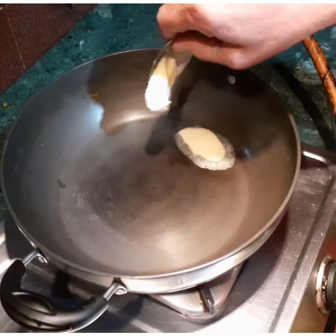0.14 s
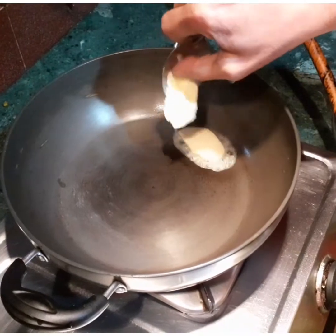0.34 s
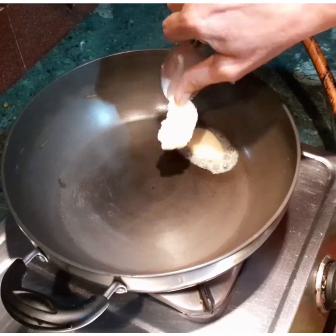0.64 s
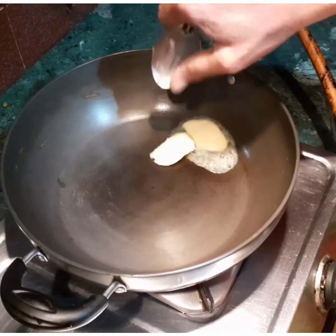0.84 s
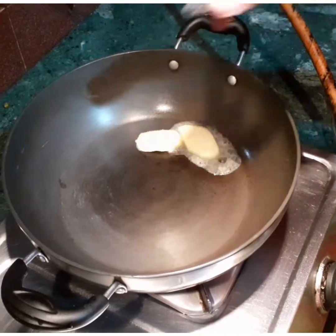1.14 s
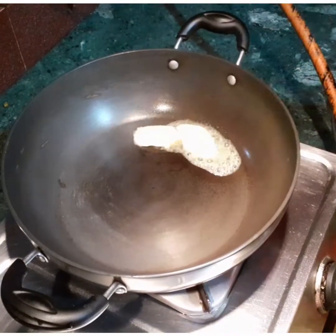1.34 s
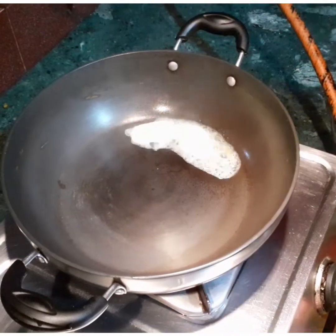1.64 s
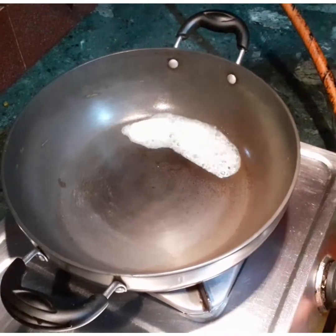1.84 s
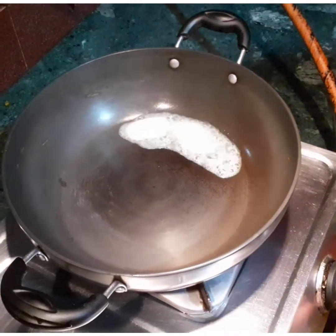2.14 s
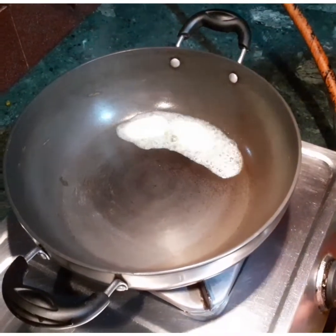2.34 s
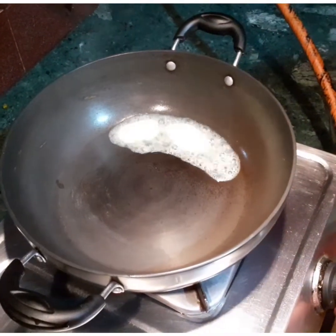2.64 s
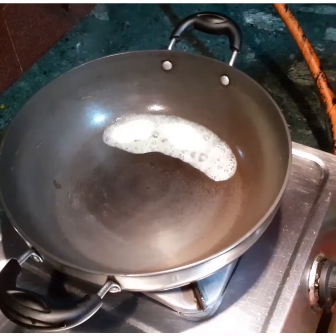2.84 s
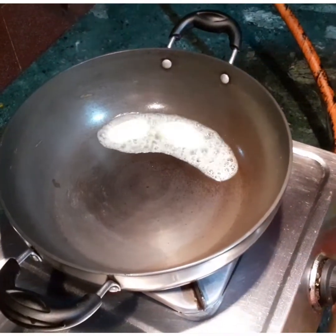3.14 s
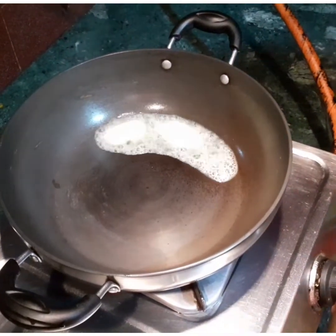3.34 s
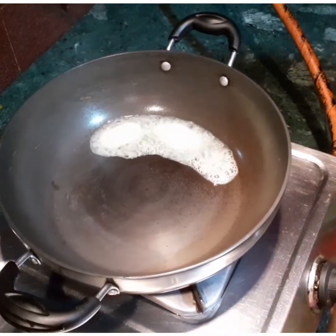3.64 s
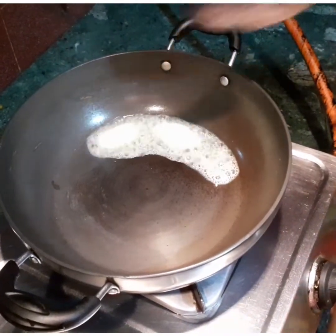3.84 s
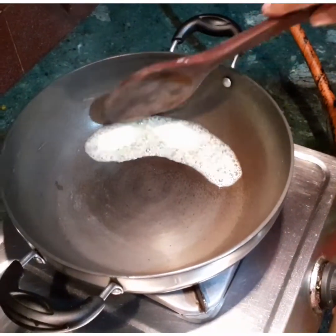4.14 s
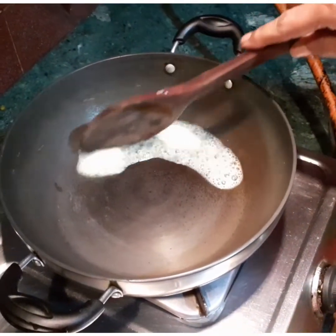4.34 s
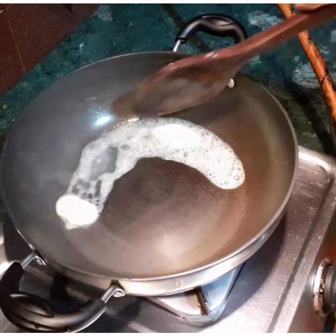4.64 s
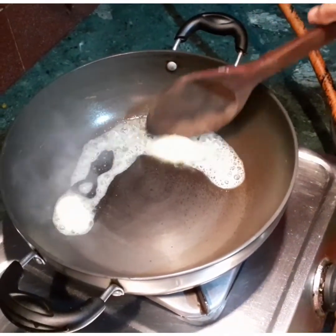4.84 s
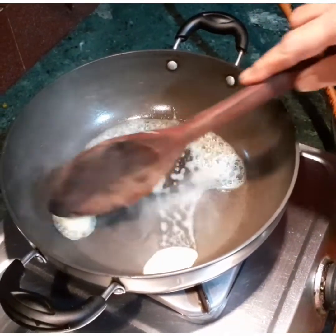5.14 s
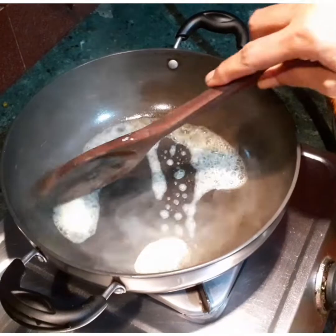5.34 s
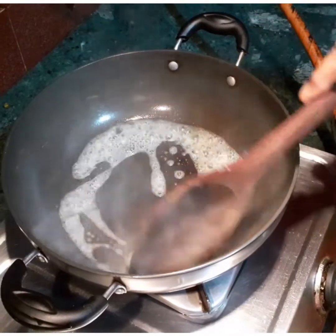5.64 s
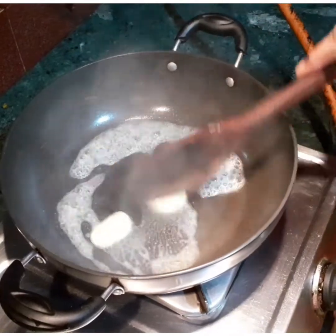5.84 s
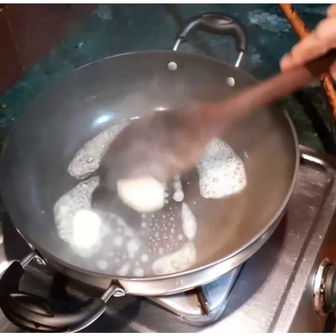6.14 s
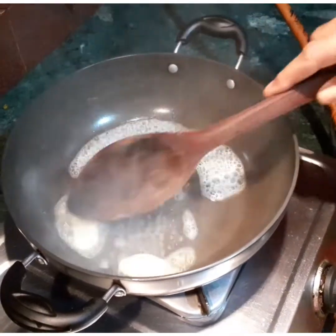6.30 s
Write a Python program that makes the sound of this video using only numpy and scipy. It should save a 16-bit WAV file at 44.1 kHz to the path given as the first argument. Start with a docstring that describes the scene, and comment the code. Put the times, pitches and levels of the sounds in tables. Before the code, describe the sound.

Butter sizzles close to the microphone for the whole six and a half seconds: a fine, high fizz with tiny bursting bubbles, over a low, slightly wavering appliance hum. Sharp little spits of steam dot the first two seconds and return occasionally later. At about 2.5 seconds a steel spoon clinks nearby, then at 2.7 gives a short, loud, gritty scrape with a bright ring, damped by 2.9. The sizzle dips slightly afterwards and slowly recovers. From 4.2 seconds a wooden spatula knocks the thin pan, striking again at about 4.7, 4.8, 5.3 and 5.7. Each knock is a woody clack with a brief metallic ring, the later ones trailed by short, rough drags. The sizzle flares brighter around 4.4, 4.9 and 5.8 seconds as butter spreads over hot metal, with one more clear spit near 6.2. The utensils carry a short, tight kitchen reflection.

```python
"""Butter sizzling in a pan

Butter foams in a thin round pan over a gas flame, close to a phone with two microphone ports: bubbles
burst and steam spits while a kitchen appliance hums. A steel spoon clinks down and scrapes nearby,
loud enough to make the phone turn itself down. Then a wooden spatula knocks the pan and smears the
butter over hot metal, where it flares up."""
import sys
import numpy as np
from scipy import signal
from scipy.fft import rfft, irfft, next_fast_len
from scipy.io import wavfile
from scipy.ndimage import uniform_filter1d

SR = 44100
rng = np.random.default_rng(int(sys.argv[2]) if len(sys.argv) > 2 else 0)


def master_out(mix):
    """Clip the mix to full scale and print it as 16-bit PCM to the path in sys.argv[1]."""
    frames = np.transpose(np.atleast_2d(mix))
    ceiling = np.clip(frames, -1, 1)
    pcm = np.round(ceiling * 32767).astype(np.int16)
    wavfile.write(sys.argv[1], SR, pcm)


N = 285327
T = np.arange(N) / SR


def undb(db):
    return 10 ** (np.asarray(db) / 20)


def unit_rms(x):
    return x / np.sqrt(np.mean(x ** 2))


def highpass(x, hz):
    return signal.sosfilt(signal.butter(2, hz, "high", fs=SR, output="sos"), x)


def over_time(rows):
    """Table columns joined by straight lines in time."""
    times_s, *columns = np.transpose(rows)
    return [np.interp(T, times_s, column) for column in columns]


def over_frequency(rows, hz):
    """Table read on a log frequency axis."""
    points_hz, values = np.transpose(rows)
    return np.interp(np.log(hz + 1), np.log(points_hz), values)


def envelope(start_s, length_s, rise_s, fade_s):
    """Straight rise, hold to the end of the length, exponential fade."""
    return np.clip((T - start_s) / rise_s, 0, 1) * np.exp(-np.maximum(T - start_s - length_s, 0) / fade_s)


def ring(x, hz, t60_s):
    """One decaying mode driven by x."""
    pole = np.exp((2j * np.pi * hz - np.log(1000) / t60_s) / SR)
    return signal.lfilter([1], [1, -pole], x).imag


def resonance(x, hz, width_hz):
    """A mode set by its bandwidth; rms 1."""
    return unit_rms(ring(x, hz, np.log(1000) / np.pi / width_hz))


def wander(rate_hz):
    """Random steps smoothed twice; spread about 1.5."""
    hold = int(SR / rate_hz)
    steps = np.repeat(rng.standard_normal(N // hold + 1), hold)
    return 2.04 * uniform_filter1d(uniform_filter1d(steps, hold), hold)[:N]


def pops(per_s, scatter_db):
    """Two streams of random impulses of uneven size."""
    hits = rng.random((2, N)) < per_s / SR
    return hits * rng.standard_normal((2, N)) * undb(scatter_db * rng.exponential(size=(2, N)))


# Port balance. Each row: frequency in Hz, left minus right in dB.
PORT_BALANCE = [(60, 7.5), (1000, 0), (3400, 2), (4500, 2), (6000, -7.5), (8200, -8), (10000, 1.5),
                (13000, 1.5), (15500, 4.5)]
# Port coherence. Each row: frequency in Hz, left-right likeness from 0 to 1.
PORT_COHERENCE = [(60, 0.7), (130, 0.98), (290, 0.78), (640, 0), (1410, 0.1), (3100, 0.15), (6820, 0),
                  (15000, 0)]


def at_ports(pair, spectrum, lo_hz=0., hi_hz=SR):
    """Two unrelated signals become left and right with a soft-edged spectrum; their mean has rms 1."""
    size = next_fast_len(N)
    hz = np.arange(size // 2 + 1) * SR / size
    likeness = np.clip(over_frequency(PORT_COHERENCE, hz), 0, 1)
    edge_loss = np.sqrt((1 + (lo_hz / (hz + 1)) ** 8) * (1 + (hz / hi_hz) ** 8))
    gain = undb(over_frequency(spectrum, hz)) / edge_loss
    mid, side = rfft(pair, size) * gain * np.sqrt([1 + likeness, 1 - likeness])
    lean = undb(over_frequency(PORT_BALANCE, hz) / 2)
    stereo = irfft([(mid + side) * lean, (mid - side) / lean], size)[:, :N]
    return stereo / np.std(stereo.mean(axis=0))


# Pan resonances under the foam. Each row: frequency in Hz, width in Hz, relative level in dB.
FOAM_RESONANCES = [(1289, 8.4, -4), (1508, 22, -2), (1675, 56, -2.5), (1995, 74, -5), (3085, 54, 3)]


def big_bubbles(spectrum):
    """Big bubbles burst low in the spectrum and ring the pan."""
    bursts = pops(5000, 0.96)
    pan = sum(undb(db) * resonance(bursts, hz, width_hz) for hz, width_hz, db in FOAM_RESONANCES)
    return at_ports(bursts, spectrum, hi_hz=2440) + undb(-6.5) * pan


# Strongest spits of steam. Each row: start in seconds, level in dB re fizz.
STRONG_SPITS = [(.205, 3), (.255, -10), (.505, 2), (.70, 6), (.87, -7), (1.31, 4), (1.39, 3), (1.535, -2),
                (1.665, -14), (2.025, 5), (2.055, -8), (2.11, -2), (2.27, -7), (3.565, -9), (4.51, -4),
                (4.96, -10), (5.87, -19), (5.92, -12), (6.18, 1)]


def steam_spits(spectrum):
    """Droplets spit sudden puffs of steam that die in milliseconds."""
    rise_s, strong_fade_s, small_fade_s = 0.0043, 0.013, 0.012
    droplets = np.abs(pops(90, 0.3)[0])
    small = signal.lfilter([1], [1, -np.exp(-1 / (small_fade_s * SR))], droplets)
    strong = sum(undb(db) * envelope(s, rise_s, rise_s, strong_fade_s) for s, db in STRONG_SPITS)
    return (undb(-8) * small + strong) * at_ports(rng.standard_normal((2, N)), spectrum, lo_hz=2880)


# Settled foam. Each row: time in seconds, fizz in dB, fine and big bubbles in dB re fizz.
FOAM_LEVELS = [(0, -38, 3, -15), (.65, -36, 1, -18), (1.05, -35.5, 2, -17), (1.25, -35.5, 1.5, -12.5),
               (1.6, -35.5, 2.5, -13.5), (2.2, -35, -0.5, -13), (2.9, -34.5, 1, -19), (4.25, -35, -1, -15),
               (4.85, -34.5, -1.5, -17), (5.7, -34, .5, -16), (6.47, -35.5, 1, -14)]
# Fizz spectrum, with the ports' notch. Each row: frequency in Hz, relative density in dB.
FIZZ_SPECTRUM = [(410, -70), (700, -28), (757, -50), (947, -13.5), (1120, -20.5), (1500, -8), (2060, -9),
                 (2500, -8.5), (2970, -6), (3300, -5.5), (4400, -2), (5500, -3), (6630, -6.5), (8400, -26),
                 (9090, -18), (13800, -4), (15200, -3), (16200, -18)]
# Butter meets fresh hot metal. Each row: start in seconds, lift of the fine bubbles in dB.
BUTTER_FLARES = [(.74, 2), (1.58, 2), (1.97, 1), (4.4, 7), (4.89, 9), (5.79, 5.5)]


def sizzle():
    """Big, middle and fine bubbles burst in their own bands and swell together with the spits."""
    rise_s, fade_s, fizz_share = 0.11, 0.44, 0.31
    flare_db = sum(db * envelope(s, rise_s, rise_s, fade_s) for s, db in BUTTER_FLARES)
    fizz_db, fine_db, big_db = over_time(FOAM_LEVELS)
    fizz_db += fizz_share * flare_db
    fine_db += (1 - fizz_share) * flare_db
    big = big_bubbles(FIZZ_SPECTRUM) * undb(big_db + wander(15))
    middle = at_ports(pops(20000, 0.23), FIZZ_SPECTRUM, lo_hz=2730, hi_hz=7750)
    middle *= undb(0.5 * wander(25.07))
    fine = at_ports(pops(20000, 0.53), FIZZ_SPECTRUM, lo_hz=8600) * undb(fine_db + 0.5 * wander(25))
    return (big + middle + fine + steam_spits(FIZZ_SPECTRUM)) * undb(fizz_db + 0.17 * wander(9))


# Background. Each row: time in seconds, hum in dB, upper soft band in dB, lower soft band in dB.
KITCHEN_LEVELS = [(0, -55, -73, -62), (.12, -54, -65, -56.5), (.45, -54, -63.5, -66), (.99, -53, -57, -72),
                  (1.4, -55, -63, -63.5), (2.6, -55, -67, -69), (3.0, -51.5, -66, -56),
                  (3.27, -54, -61.5, -59), (3.45, -55.5, -66, -66), (3.8, -56, -51.5, -74),
                  (4.45, -54.5, -65, -68), (5.0, -54, -50.5, -77), (5.45, -50, -57, -71.5),
                  (6.0, -52, -58, -54), (6.47, -57, -50.5, -84)]
# Rumble spectrum. Each row: frequency in Hz, relative density in dB.
RUMBLE_SPECTRUM = [(15, -70), (25, -56), (45, -33), (91, -7), (166, -11), (202, -10.5), (262, -10.5),
                   (492, -11), (560, -9.5), (750, -14.5), (1200, -12), (1560, -46), (2640, -120)]
# Mains tones. Each row: frequency in Hz, level in dB re hum.
MAINS_TONES = [(100, -6.5), (200, 0.5), (300, -9.5)]
# Rough low bands. Each row: frequency in Hz, width in Hz, level in dB re hum.
ROUGH_BANDS = [(84, 3.1, -14), (140.4, 3.2, -12), (219.8, 6.5, -5.5)]
# Soft bands, upper first. Each row: frequency in Hz, width in Hz.
SOFT_BANDS = [(569, 31), (374.6, 30)]


def appliance_hum():
    """Rumble with wavering mains tones and rough low bands; two soft bands come and go."""
    hum_db, *bands_db = over_time(KITCHEN_LEVELS)
    hum = at_ports(rng.standard_normal((2, N)), RUMBLE_SPECTRUM) * undb(-3 + 1.6 * wander(7.9))
    for hz, db in MAINS_TONES:
        level = undb(db + 0.52 * wander(5.5) + 1.8 * wander(24.11))
        hum += level * np.sin(2 * np.pi * hz * T + wander(4))
    for hz, width_hz, db in ROUGH_BANDS:
        hum += undb(db) * resonance(rng.standard_normal(N), hz, width_hz)
    soft = sum(undb(db) * resonance(rng.standard_normal(N), hz, width_hz)
               for (hz, width_hz), db in zip(SOFT_BANDS, bands_db))
    return hum * undb(hum_db) + soft


# Steel spoon modes. Each row: frequency in Hz, scrape level in dB, T60 in seconds, strongest moment
# in seconds, spread around it in seconds, tap level in dB.
SPOON_MODES = [(1970, -21, .2, 2.72, .07, -40), (2180, -14, .18, 2.74, .06, -25),
               (2710, -21, .12, 2.72, .08, -18), (2988, -15, .4, 2.76, .06, -40),
               (3610, -20, .12, 2.76, .08, -16), (3946, -11, .12, 2.73, .04, -10),
               (4172, -15, .06, 2.72, .07, -4), (4370, -18, .08, 2.72, .09, -12),
               (4680, -23, .1, 2.7, .06, -11), (4840, -9, .13, 2.72, .06, -40),
               (5421, -13, .2, 2.77, .08, -13), (5749, -12, .15, 2.72, .08, -40),
               (6207, -16, .15, 2.72, .08, -20), (7090, -4, .3, 2.78, .05, -22),
               (9254, -18, .2, 2.79, .07, -30), (10230, -24, .12, 2.75, .08, -26),
               (10740, -19, .12, 2.76, .09, -18), (11270, -10, .25, 2.79, .07, -16),
               (11840, -12, .2, 2.73, .08, -15), (12130, -11, .12, 2.72, .07, -11),
               (12930, -4, .1, 2.70, .13, -4), (13760, 0, .3, 2.79, .1, -6),
               (15120, -7, .1, 2.73, .08, -16), (15400, -10, .15, 2.70, .07, -30),
               (15700, -4, .3, 2.77, .08, -30)]
# Clink, scrape, light end. Each row: start and length in seconds, then tap, slide and rasp in dB.
SPOON_CONTACTS = [(2.458, 0.029, -26, -70, -27), (2.665, 0.2, -31.5, -24.5, -27.5),
                  (2.86, 0.025, -70, -70, -38)]


def spoon():
    """A gritty contact rasps and feeds the spoon's modes, each strong in turn, until a hand damps them."""
    touch_s, tap_s, lift_s, rasp_fade_s = 0.001, 0.028, 0.003, 0.014
    strike_db, strike_fade_s, press_db_per_s = -2, 0.002, 18
    damp_from_s, damp_fade_s = 2.865, 0.037
    tap = slide = rasp = 0
    for start_s, length_s, tap_db, slide_db, rasp_db in SPOON_CONTACTS:
        strike = undb(strike_db) * envelope(start_s, touch_s, touch_s, strike_fade_s)
        tap += undb(tap_db) * (envelope(start_s, tap_s, touch_s, lift_s) + strike)
        press_db = press_db_per_s * np.clip(T - start_s, 0, length_s)
        slide += undb(slide_db + press_db) * envelope(start_s, length_s, touch_s, lift_s)
        rasp += undb(rasp_db) * envelope(start_s, length_s, touch_s, rasp_fade_s)
    span = slice(int(2.4 * SR), int(3.2 * SR))
    t = T[span]
    chatter_db = 1.2 * wander(150)[span]
    ringing = 0
    for hz, scrape_db, t60_s, peak_s, spread_s, tap_db in SPOON_MODES:
        reach = np.exp(-0.5 * ((t - peak_s) / spread_s) ** 2)
        feed = tap[span] * undb(tap_db) + slide[span] * undb(scrape_db + chatter_db) * reach
        shared_grit = rng.standard_normal(len(t))
        grit = shared_grit + 2.3 * rng.standard_normal((2, len(t)))
        # the root keeps the level independent of the decay
        ringing += ring(grit * feed, hz, t60_s) * np.sqrt(np.log(1000) / t60_s / SR)
    sound = steel_rasp() * rasp
    sound[:, span] += ringing * np.exp(-np.maximum(t - damp_from_s, 0) / damp_fade_s)
    return sound


# Rasp spectrum. Each row: frequency in Hz, relative density in dB.
RASP_SPECTRUM = [(120, -47), (200, -11), (780, -16.5), (1150, -7.5), (1820, -17.5), (2140, -26),
                 (2440, -18), (4900, -10), (6700, -11), (7080, -10), (9680, -22), (13500, 7.5), (16200, -9)]


def steel_rasp():
    """Dense, stuttering grit of the spoon's contact."""
    return at_ports(pops(9000, 0.48), RASP_SPECTRUM) * undb(2 * wander(90))


# Pan modes. Each row: frequency in Hz, level in dB struck on the wall, level in dB struck on the
# floor, T60 in seconds, left minus right in dB.
PAN_MODES = [(155.5, -14, -38, 0.37, 7), (273.7, -6.5, -9, 0.88, -2), (406, 0, -15.5, 0.7, 4),
             (622, -9, -21.5, 0.81, 7), (714, -19, -30, 0.29, -7), (832, -18, -11, 0.5, -11),
             (917, -14, -3.5, 0.2, 15), (1192, -12, -7.5, 0.57, 2), (1300, -15, -5, 0.14, -15),
             (1850, -2, -17, 0.29, -9), (2140, -22, -6, 0.2, 0), (2200, -33, -10, 0.19, -2),
             (2369, -4, -16, 0.2, -16), (2450, -10, -11, 0.19, 7), (2840, -6, -4, 0.1, -16),
             (3080, -7, 6, 0.081, 7), (3360, -10, -7, 0.068, 26)]
# Spatula modes. Each row: frequency in Hz, level in dB, T60 in seconds, left minus right in dB.
WOOD_MODES = [(444, 1, 0.087, -1), (552, 0, 0.2, 2), (895, -8, 0.39, 0), (977, -12, 0.21, 24.5),
              (1494, -1, 0.069, -2), (1630, 4, 0.12, 10)]


def pan_and_wood(t, place, pan_db, wood_db):
    """The modes of one blow swell in and ring out; high ones swell much faster."""
    bloom_hz, bloom_s, contact_s = 300, 0.03, 0.0013
    modes = [(hz, pan_db + wall_db + place * (floor_db - wall_db), t60_s, lean_db)
             for hz, wall_db, floor_db, t60_s, lean_db in PAN_MODES]
    modes += [(hz, wood_db + db, t60_s, lean_db) for hz, db, t60_s, lean_db in WOOD_MODES]
    sound = np.zeros((2, len(t)))
    for k, (hz, db, t60_s, lean_db) in enumerate(modes):
        swell_s = bloom_s / max(hz / bloom_hz, 1) ** 3.7
        wave = (-1) ** k * np.exp((2j * np.pi * hz - np.log(1000) / t60_s) * t)
        wave *= 1 - np.exp(-(t / swell_s) ** 2)
        sides = undb(np.array([[lean_db], [-lean_db]]) / 2)
        port_phase_rad = hz / 1100
        sound += undb(db) * sides * [wave.imag, (wave * np.exp(1j * port_phase_rad)).imag]
    return sound * (1 - np.exp(-t / contact_s))


# Spatula blows. Each row: start in seconds, place from 0 (wall) to 1 (floor), pan, wood and crack
# levels in dB, crack centre in Hz, crack decay in seconds, clatter in dB.
SPATULA_BLOWS = [(4.219, 0.39, -42, -31, -15.5, 910, 0.0018, -37),
                 (4.679, 0.036, -24.5, -40, -23, 2370, 0.0025, -32),
                 (4.779, 0.63, -58, -30.5, -21, 1310, 0.0013, -35.5),
                 (5.318, 1, -29, -30, -14, 1220, 0.0027, -32),
                 (5.672, 0.55, -25, -48, -12, 2280, 0.0018, -30)]


def spatula_knocks():
    """Each blow starts with a short crack, rings pan and wood, and ends in a rough clatter."""
    track = np.zeros((2, N + SR))
    t = T[:SR]
    for start_s, place, pan_db, wood_db, crack_db, crack_hz, crack_s, clatter_db in SPATULA_BLOWS:
        blow = pan_and_wood(t, place, pan_db, wood_db)
        noise = rng.standard_normal(SR) + 0.8 * rng.standard_normal((2, SR))
        noise = highpass(noise, 400)  # thin wood has no thump
        phase = 2 * np.pi * crack_hz * t
        crack = (np.sin(phase) + 0.45 * np.sin(0.61 * phase)) * np.exp(-t / crack_s)
        blow -= undb(crack_db) * highpass(crack, 0.28 * crack_hz)
        blow += ring(noise * undb(crack_db - 6) * np.exp(-t / 0.0018), crack_hz, t60_s=0.002)
        blow += ring(noise * undb(clatter_db) * np.exp(-t / 0.078), hz=1460, t60_s=0.00088)
        start = int(start_s * SR)
        track[:, start:start + SR] += blow
    # small objects radiate no deep bass; the wooden tip is too soft for high treble
    return signal.sosfilt(signal.butter(6, [130, 3550], "band", fs=SR, output="sos"), track[:, :N])


# Drags around the knocks. Each row: start in seconds, length in seconds, level in dB.
DRAG_STROKES = [(4.696, 0.086, -34.5), (4.794, 0.12, -45.5), (5.303, 0.07, -38.5), (5.682, 0.037, -41)]
# Drag spectrum. Each row: frequency in Hz, relative density in dB.
DRAG_SPECTRUM = [(200, -20), (300, 0), (600, 3.5), (1000, 2.5), (1400, -16), (2500, -19), (3600, -35)]


def spatula_drags():
    """Wood stutters over the pan's coating: uneven midrange grit."""
    pressure = sum(undb(db) * envelope(start_s, length_s, rise_s=0.0092, fade_s=0.019)
                   for start_s, length_s, db in DRAG_STROKES)
    return at_ports(pops(6000, 1.0), DRAG_SPECTRUM) * undb(1.7 * wander(60)) * pressure


def room(x):
    """Tiles and worktop return a short dense tail, different at each port except in the bass."""
    tail_db, t60_s, delay_s = -3.5, 0.2, 0.003
    shared_below_hz, thin_below_hz = 587, 600
    t = T[:SR // 2]
    tail = rng.standard_normal((2, len(t))) * np.exp(-np.log(1000) * t / t60_s) * (t > delay_s)
    bass = signal.butter(2, shared_below_hz, fs=SR, output="sos")
    tail[1] += signal.sosfiltfilt(bass, tail[0] - tail[1])
    tail /= np.sqrt(np.sum(tail ** 2, axis=1, keepdims=True))
    return x + undb(tail_db) * signal.fftconvolve(x, highpass(tail, thin_below_hz), axes=1)[:, :N]


def scene():
    """Sizzle and hum throughout; the utensils sound in the room."""
    return sizzle() + appliance_hum() + room(spoon() + spatula_knocks() + spatula_drags())


def record(dry):
    """The phone turns down quickly when the sound stays loud, recovers slowly and cuts the top steeply."""
    window_s, threshold_db, cut_db_per_db, recover_db_per_s = 0.24, -26, 0.69, 1
    top_hz = 15850
    size = int(window_s * SR)
    power = uniform_filter1d(np.mean(dry, axis=0) ** 2, size, origin=(size - 1) // 2)
    target_cut_db = cut_db_per_db * np.maximum(10 * np.log10(power + 1e-12) - threshold_db, 0)
    cut_db = np.maximum.accumulate(target_cut_db + recover_db_per_s * T) - recover_db_per_s * T
    lowpass = signal.ellip(12, 0.2, 70, top_hz, fs=SR, output="sos")
    return signal.sosfilt(lowpass, dry * undb(-cut_db))


dry = scene()
out = record(dry)
master_out(out)
```